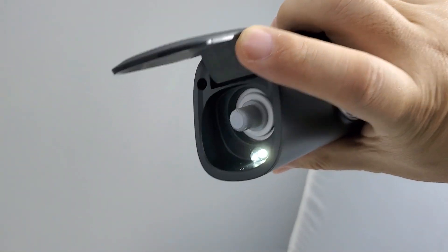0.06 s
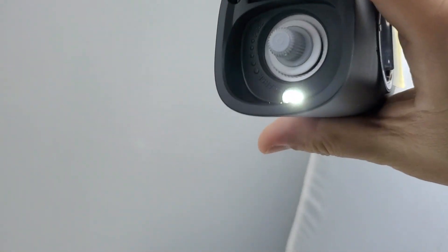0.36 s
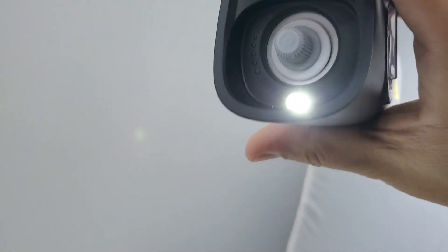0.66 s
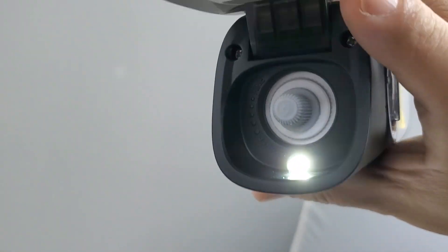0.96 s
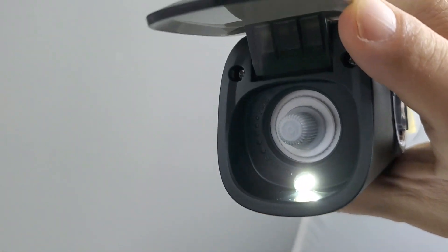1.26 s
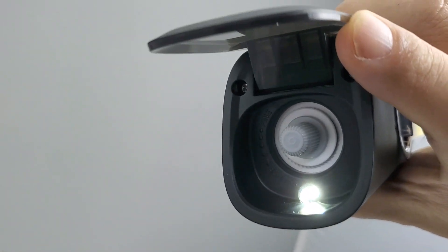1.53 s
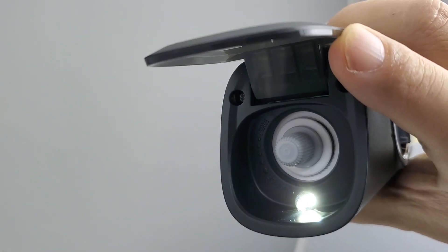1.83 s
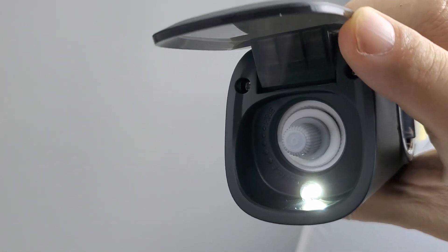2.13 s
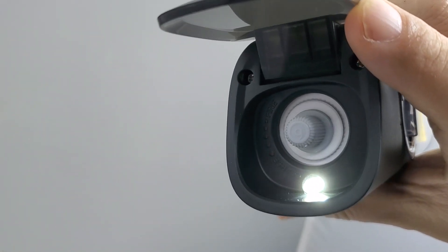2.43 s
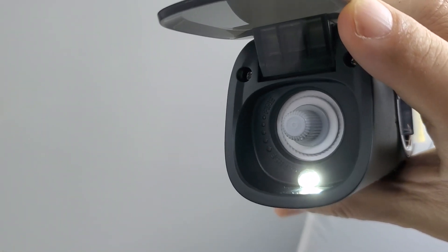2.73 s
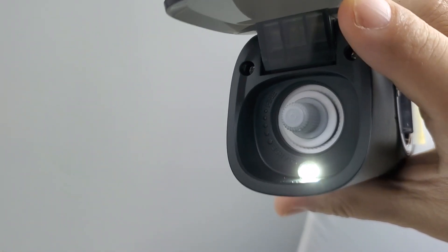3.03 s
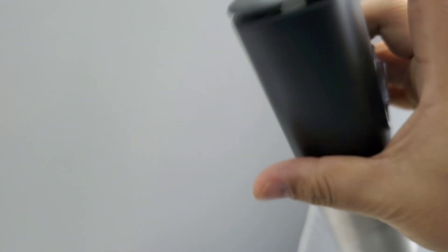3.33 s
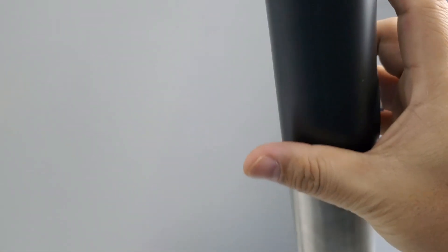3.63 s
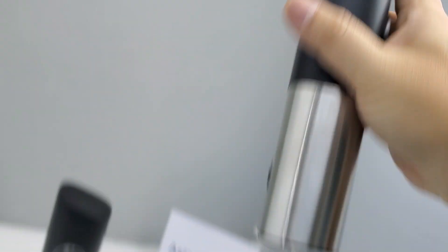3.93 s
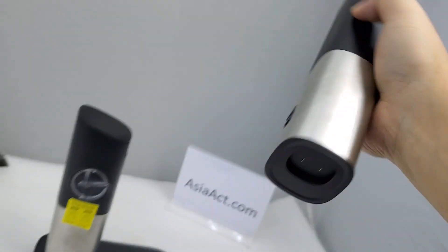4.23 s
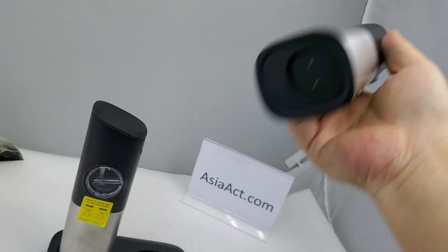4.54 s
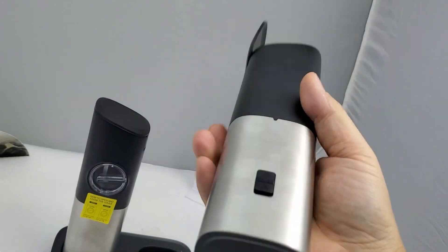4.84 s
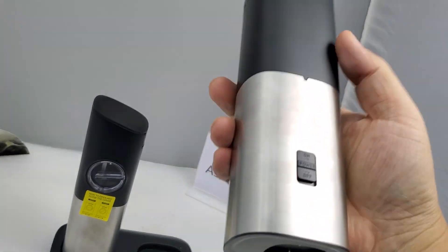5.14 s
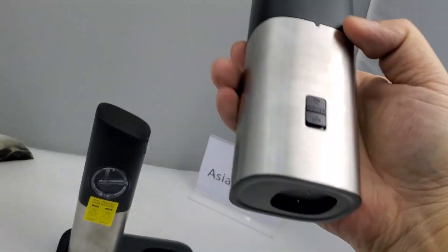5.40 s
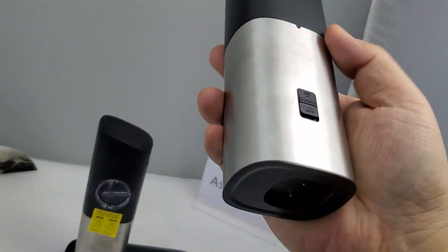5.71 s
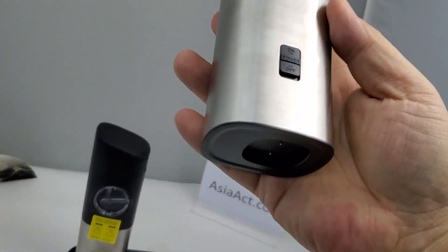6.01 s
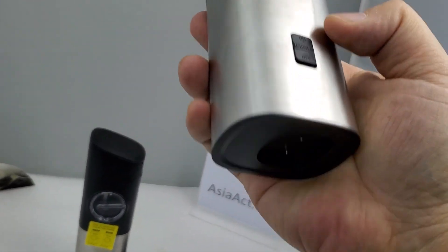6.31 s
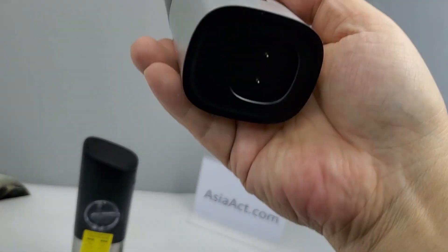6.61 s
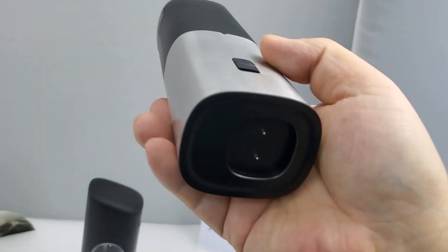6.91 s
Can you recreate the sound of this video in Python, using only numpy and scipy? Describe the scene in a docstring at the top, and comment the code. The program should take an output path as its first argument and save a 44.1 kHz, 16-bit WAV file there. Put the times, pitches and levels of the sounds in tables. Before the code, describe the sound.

A battery pepper mill is already running empty, close by and slightly to the left in a small room: a steady motor whine with a fine, buzzy gear rattle. Around 3.2 seconds its dry shaft squeals faintly. At 3.3 a sharp double switch snap cuts the power, and the motor winds down over half a second. Fingers rub the case softly and loose parts tick from about 4 to 4.5 seconds. The motor then spins up for a short burst, with a click and thin squeaks, coasting down from 4.9. Another sharp double snap comes at 5.1. Soft finger strokes follow until about 6.2, with a couple of small ticks near 6.1. A last brief whir starts at 6.7 seconds, squeaks once and begins slowing just before 7. A low room rumble and faint hiss continue underneath throughout.

```python
"""A small motor whines and rattles: a battery pepper mill running empty, hand-held, close by in a small room.
One long run, then two short ones. The rotor hums at multiples of the shaft rate and the gear teeth ring
the housing, heard first from the open mouth, then from the steel base, then mostly from the mouth again.
The dry shaft squeals, a switch snaps, fingers rub the case, loose parts tick, the room rumbles beneath."""
import sys
import numpy as np
from scipy import signal
from scipy.fft import rfft, irfft
from scipy.io import wavfile
from scipy.ndimage import uniform_filter1d, map_coordinates

SR = 44100
rng = np.random.default_rng(int(sys.argv[2]) if len(sys.argv) > 2 else 0)


def master(y):
    """Save y as 16-bit WAV."""
    cut = np.clip(np.atleast_2d(y).T, -1, 1)
    pcm = np.round(cut * 32767)  # scale
    wavfile.write(sys.argv[1], SR, pcm.astype(np.int16))


N = 311346
T = np.arange(N) / SR

# Spectra of room rumble, air and skin friction. Each row: frequency in Hz, level in dB.
RUMBLE_SPECTRUM = [(12, -21), (20, -5.5), (45, -4.5), (85, -12.5), (140, -20), (200, -20), (330, -24.5),
                   (450, -31.5), (650, -51.5), (1300, -100)]
AIR_SPECTRUM = [(300, 7), (600, 6), (950, -0.5), (1400, 2.5), (2000, -7.5), (3000, -15.5), (5000, -20.5),
                (7500, -19), (9500, -39), (16000, -27.5)]
RUB_SPECTRUM = [(400, 14), (1500, -17), (3000, 3.5), (5000, 0), (7500, 6), (9500, -7), (13000, 0),
                (16000, -0.5)]
# Room modes in the rumble. Each row: centre in Hz, width in Hz, level in dB.
ROOM_MODES = [(39, 20, 0), (67, 9.9, -3), (217, 11, -17)]
# Finger strokes. Each row: midpoint in seconds, length in seconds, level in dB, relative sheen in dB.
FINGER_STROKES = [(3.975, .03, -66, -2), (4.085, .08, -59, 0), (4.21, .21, -61.5, 1), (4.36, .09, -69, 0),
                  (4.495, .03, -63, 5), (5.31, .06, -57, 3), (5.41, .05, -64, -8), (5.515, .13, -60, 3),
                  (5.59, .1, -57, -13), (5.725, .06, -58, 2), (5.962, .12, -58, 1), (6.07, .09, -66, -10),
                  (6.135, .06, -55, -1), (6.205, .035, -63, 1), (6.558, .05, -64, -2)]

# Spectra of a tick and of the switch crack. Each row: frequency in Hz, level in dB.
TICK_SPECTRUM = [(300, -47), (1500, 1), (1850, -5), (2200, 7), (2750, 0), (3150, 3), (3500, 13), (4300, -4),
                 (5300, -13), (6100, 3.5), (8000, -5), (10000, -28), (15000, -26)]
CRACK_SPECTRUM = [(200, -36.5), (350, -8.5), (520, -10), (900, -8.5), (1500, 1), (2700, -0.5), (3400, -4),
                  (3900, 1), (5400, -2.5), (7500, -3.5), (9600, -9.5), (11700, -2.5), (14500, -5.5),
                  (16000, -9.5)]
# Modes of the case and of the whole held body. Each row: frequency in Hz, level in dB, T60 in seconds.
CASE_MODES = [(1510, -11, .05), (1890, -15, .06), (2450, -2.5, 0.098), (2467, -5.5, 0.095), (3360, -2, .05),
              (3860, -2.5, .05), (4620, -4.5, .04), (5330, 6.5, 0.032), (5750, -5, .04),
              (7000, -7.5, 0.034), (11700, -7, .05), (11880, -7, .04), (12600, -2, .04), (13700, -0.5, .05),
              (14150, -5.5, .05)]
BODY_MODES = [(325, 0, .032), (390, 0, .03), (460, -9, .03), (680, -4, .025), (840, -4, .02)]
# Loose parts ticking. Each row: start in seconds, level in dB, contact time in seconds.
LOOSE_TICKS = [(4.068, -30, .05), (4.090, -26, .03), (4.468, -32, 0.065), (6.114, -23.5, .008),
               (6.1435, -19.5, .002)]
# Switch snaps and gears taking up slack. Each row: start in seconds, level in dB, thump and knock in dB
# re the crack, knock pitch in Hz, knock T60 in seconds, left minus right in dB.
SNAPS = [(3.3428, 9, -11, -2.5, 1300, .005, -2.5), (3.4116, -5, -11, -8, 1500, .014, 6),
         (4.5082, -24.5, -28, 9.5, 3670, 0.045, -.5), (4.5919, -3.3, -35, 5, 2560, .03, 5),
         (5.117, 10.5, -16.5, -7.5, 2800, .006, 1.5), (5.2025, -6.5, -16, -12, 1500, .014, 3)]
# Shaft squeals. Each row: start and length in seconds, first and last pitch in Hz, level in dB.
SHAFT_SQUEALS = [(3.166, .21, 2774, 2650, -45), (3.458, .17, 2686, 2570, -47),
                 (4.524, .05, 2675, 2680, -41), (4.625, .07, 2700, 2820, -40),
                 (4.797, .05, 2670, 2760, -40), (4.96, .15, 2688, 2630, -37.5),
                 (6.77, .05, 2480, 2600, -43.5)]

# Motor runs. Each row: on and off time in seconds, free shaft rate in Hz, braking in Hz per second,
# treble gain in dB, hum gain under power and while coasting in dB.
MOTOR_RUNS = [(-1, 3.372, 226.8, 425, .3, -2.8, 11), (4.503, 4.895, 230, 505, 1.2, -4.5, -8),
              (6.662, 6.94, 223, 530, -2, -3, -6)]
# How the mill is held. Each row: time in seconds, share of the mouth from 0 to 1, nearness gain in dB,
# left minus right in dB, lead of the left channel in milliseconds.
MILL_POSE = [(0, 1, -.6, 2.7, .13), (1.5, .99, 0, 2.3, .14), (2.85, 1, 1.2, 1.5, .14),
             (3.1, .98, -2.4, 1.5, .14), (3.3, .95, -1.3, 1.5, .14), (3.42, .6, -6, 4, .044),
             (3.7, .45, -4.4, 2.5, .027), (4.5, .15, -3.5, 1, .065), (4.88, .07, -3, 1.5, .03),
             (5.1, .01, 1, 2, .011), (6.7, .7, -2, 3.3, .11), (6.92, .7, -2.8, 3.3, .13),
             (7.06, .7, 0, 3.3, .14)]
# Housing resonances at mouth and base. Each row: centre in Hz, width in Hz, level in dB.
MOUTH_RESONANCES = [(1113, 70, -5), (1347, 50, -7), (1530, 250, .2), (1815, 55, -6.5), (2480, 210, -8.5),
                    (2735, 140, -3.2), (2944, 340, -7), (3490, 100, -15), (3860, 250, -8.5),
                    (4850, 170, -10.5), (5390, 170, -9), (5800, 300, -8.5), (7120, 110, -15),
                    (10520, 220, -18), (13300, 210, -18.5), (14150, 160, -18.5)]
BASE_RESONANCES = [(1100, 350, -7), (1520, 590, -7.5), (2100, 350, -11), (2620, 280, -.5), (2900, 220, -5),
                   (3190, 240, -2), (3750, 1100, -11), (5400, 1100, -10), (8770, 30, -18),
                   (10600, 280, -18.5), (14300, 900, -14.5)]
# Broad radiation between the resonances. Each row: frequency in Hz, level in dB.
SHELL_SPECTRUM = [(150, -40), (500, -31.5), (780, -19.5), (950, -18.5), (1300, -22), (2050, -18.5),
                  (2400, -13.5), (3300, -15.5), (4350, -14.2), (6000, -13), (8100, -17), (9000, -25.5),
                  (12000, -23.7), (14500, -20.5), (16000, -18.5)]
# Gear mesh tones. Each row: multiple of the shaft rate, level in dB re the tooth impacts.
MESH_TONES = [(5, -32), (6, -28), (7, -28), (9, -23), (11, -27), (12, -22), (13, -23), (15, -18.5),
              (18, -23), (24, -20.5)]
# Rotor hum. Each row: multiple of the shaft rate, level at mouth and at base in dB, before the hum gain.
ROTOR_TONES = [(2, -30.5, -40.5), (3, -26, -18), (4, -15.5, -43.5)]

RUMBLE_DB, AIR_DB, ROOM_T60_S = -44, -61, .3
GRIP_DB, SHEEN_HZ = -76.8, 9000
SPIN_UP_S, ENGAGE_S = .053, .028  # time constants: shaft speed, tooth load
MILL_DB, TREBLE_HZ = -36, 4300
RATTLE_EXPONENT, TREBLE_EXPONENT = .78, 1.55
CUTOFF_HZ = 15750


def undb(db):
    """Decibels to gain."""
    return 10 ** (np.asarray(db) / 20)


def unit(x):
    """Scale to rms 1."""
    return x / np.sqrt(np.mean(x ** 2))


def curves(rows):
    """Table columns, interpolated linearly over time."""
    times_s, *columns = np.transpose(rows)
    return [np.interp(T, times_s, column) for column in columns]


def pan(db):
    """Left and right gains for a level difference."""
    return undb(np.array([db, -db]).reshape(2, -1) / 2)


def colour(x, spectrum, resonances=(), size=4096):
    """Minimum-phase filter from a broad spectrum plus resonances."""
    bins_hz = np.maximum(np.fft.rfftfreq(size, 1 / SR), 1)
    hz, db = np.transpose(spectrum)
    power = undb(np.interp(np.log(bins_hz), np.log(hz), db)) ** 2
    power /= 1 + (hz[0] / bins_hz / 2) ** 4
    for centre_hz, width_hz, peak_db in resonances:
        power += undb(peak_db) ** 2 / (1 + (2.16 * (bins_hz - centre_hz) / width_hz) ** 2) ** 2
    cepstrum = irfft(np.log(power) / 2)
    cepstrum[1:size // 2] *= 2
    cepstrum[size // 2 + 1:] = 0
    response = irfft(np.exp(rfft(cepstrum)))
    return signal.fftconvolve(np.atleast_2d(x), response[None], axes=1)[:, :x.shape[-1]]


def split(x, hz):
    """Bands below and above a frequency."""
    low = signal.sosfiltfilt(signal.butter(3, hz, fs=SR, output="sos"), x)
    return low, x - low


def wander(rate_hz):
    """Smooth random drift, rms 1."""
    knots = signal.resample(rng.standard_normal(1024), 8192)
    return unit(np.interp(T * rate_hz, np.linspace(0, 1024, len(knots)), knots))


def stereo(three, correlation):
    """Left and right from one shared signal and two separate ones."""
    return np.sqrt(correlation) * three[0] + np.sqrt(1 - correlation) * three[1:]


def stereo_noise(samples, correlation):
    """Partly correlated white noise."""
    return stereo(rng.standard_normal((3, samples)), correlation)


def decay(t, t60_s):
    """Exponential decay."""
    return np.exp(-np.log(1000) * t / t60_s)


def add(out, start_s, sound):
    """Mix a sound in at a time."""
    i = int(start_s * SR)
    out[:, i:i + sound.shape[1]] += sound[:, :N - i]


def room_tone():
    """Deep rumble, near mono, under faint air."""
    rumble = unit(colour(stereo_noise(N, correlation=.98), RUMBLE_SPECTRUM, ROOM_MODES, size=32768))
    air = unit(colour(stereo_noise(N, correlation=.31), AIR_SPECTRUM))
    return undb(RUMBLE_DB) * rumble + undb(AIR_DB) * air


def reflections(x, wet_db, predelay_s=.006):
    """Diffuse tail of a small furnished room."""
    t = np.arange(SR // 2) / SR
    tail = rng.standard_normal((2, len(t))) * decay(t, ROOM_T60_S) * (t > predelay_s)
    tail = unit(colour(tail, [(200, -5), (3000, 10), (14000, .5)])) / np.sqrt(len(t))
    return undb(wet_db) * signal.fftconvolve(x, tail, axes=1)[:, :N]


def fingers():
    """Skin catches and slips on the case in uneven grains; strokes swell over a restless grip."""
    grains = rng.standard_normal((3, N)) * undb(rng.standard_normal(N) + 2.7 * wander(90))
    friction = unit(colour(stereo(grains, correlation=.13), RUB_SPECTRUM))
    scuff, sheen = split(friction, SHEEN_HZ)
    out = undb(GRIP_DB + 2 * wander(6)) * (scuff + sheen)
    for mid_s, length_s, db, sheen_db in FINGER_STROKES:
        on = np.abs(T - mid_s) < length_s / 2
        pressure = np.cos(np.pi * (T[on] - mid_s) / length_s)
        out[:, on] += undb(db) * pressure * (scuff[:, on] + undb(sheen_db) * sheen[:, on])
    return out


def case_impact(t, spectrum, crack_t60_s, ring_db, contact_s):
    """Crack, scattered tail and case ring; long contact blunts the onset. Energy 1."""
    onset = 1 - decay(t, contact_s)
    envelope = (decay(t, crack_t60_s) + undb(-13) * decay(t, .09)) * onset
    crack = colour(stereo_noise(len(t), correlation=.45) * envelope, spectrum)
    ring = sum(undb(db) * decay(t, t60_s) * np.sin(2 * np.pi * hz * t + rng.normal(0, .7, (2, 1)))
               for hz, db, t60_s in CASE_MODES)
    return unit(unit(crack) + undb(ring_db) * unit(ring * onset)) / np.sqrt(len(t))


def damped_mode(t, hz, t60_s, rise_cycles=1.8):
    """Heavily damped mode that swells over its first cycles. Energy 1."""
    onset = 1 - np.exp(-t * hz / rise_cycles)
    return unit(np.sin(2 * np.pi * hz * t) * decay(t, t60_s) * onset) / np.sqrt(len(t))


def loose_ticks():
    """Loose parts tick and scuff on the case."""
    out, t = np.zeros((2, N)), np.arange(SR // 4) / SR
    for start_s, db, contact_s in LOOSE_TICKS:
        tick = case_impact(t, TICK_SPECTRUM, crack_t60_s=.039, ring_db=-14, contact_s=contact_s)
        add(out, start_s, undb(db) * pan(3) * tick)
    return out


def snaps():
    """Switch and gear slack crack, knock the plastic and thump the whole body."""
    out, t = np.zeros((2, N)), np.arange(SR // 4) / SR
    body = sum(undb(db) * damped_mode(t, hz, t60_s) for hz, db, t60_s in BODY_MODES)
    for start_s, db, thump_db, knock_db, knock_hz, knock_t60_s, pan_db in SNAPS:
        crack = case_impact(t, CRACK_SPECTRUM, crack_t60_s=.048, ring_db=-10, contact_s=.0026)
        thump = undb(thump_db) * pan(-3) * body
        knock = undb(knock_db) * damped_mode(t, knock_hz, knock_t60_s)
        add(out, start_s, undb(db) * pan(pan_db) * (crack + thump + knock))
    return out


def shaft_squeals():
    """The dry shaft sticks and slips: short wobbling tones near the main housing resonance."""
    out = np.zeros((2, N))
    wobble = 1 + .02 * wander(130)
    phase_rad = np.array([[0], [1.1]])
    for start_s, length_s, first_hz, last_hz, db in SHAFT_SQUEALS:
        on = (T > start_s) & (T < start_s + length_s)
        progress = (T[on] - start_s) / length_s
        hz = (first_hz + (last_hz - first_hz) * progress) * wobble[on]
        swell = np.sqrt(np.abs(np.sin(np.pi * progress)))
        tone = np.sqrt(2) * np.sin(2 * np.pi * np.cumsum(hz) / SR + phase_rad)
        add(out, start_s, undb(db) * swell * tone)
    return out * pan(2) * undb(2.5 * wander(60))


def motor():
    """Powered, the shaft races to its free speed; switched off, friction brakes it evenly to rest."""
    shaft_hz, tooth_load, treble_gain, hum_db = np.zeros((4, N))
    for on_s, off_s, free_hz, brake_hz_per_s, treble_db, powered_db, coasting_db in MOTOR_RUNS:
        run = T >= on_s
        powered_s = np.minimum(T[run], off_s) - on_s
        coasting_s = np.maximum(T[run] - off_s, 0)
        driven_hz = free_hz * (1 - np.exp(-powered_s / SPIN_UP_S))
        shaft_hz[run] = np.maximum(driven_hz - brake_hz_per_s * coasting_s, 0)
        pace = shaft_hz[run] / free_hz
        tooth_load[run] = np.where(coasting_s > 0, pace, 1 - np.exp(-powered_s / ENGAGE_S))
        treble_gain[run] = undb(treble_db) * pace ** TREBLE_EXPONENT
        hum_db[run] = powered_db + (coasting_db - powered_db) * (1 - np.exp(-coasting_s / SPIN_UP_S))
    return shaft_hz, tooth_load, treble_gain, hum_db


def shaft_tone(turns, multiple, db, waver_db):
    """Shaft harmonic whose level wavers with the load."""
    load = wander(7) + wander(45)
    amplitude = np.sqrt(2) * undb(db + waver_db * load)
    return amplitude * np.sin(2 * np.pi * (multiple * turns + rng.random()))


def rotor_hum(turns, pace, mouth_share, hum_db):
    """Low shaft harmonics that grow with speed and leave the mouth in a narrow beam."""
    beam = mouth_share ** 3
    hum = sum(shaft_tone(turns, multiple, hum_db + beam * mouth_db + (1 - beam) * base_db, waver_db=1.8)
              for multiple, mouth_db, base_db in ROTOR_TONES)
    return hum * pace ** 2


def worn_track(turns, harmonics=80):
    """Brushes pass the same scratches every turn: a buzz of high shaft harmonics."""
    spectrum = np.exp(2j * np.pi * rng.random(harmonics)) * (np.arange(harmonics) > 7)
    surface = irfft(spectrum, harmonics * 16)
    return unit(np.interp(turns % 1, np.linspace(0, 1, len(surface)), surface))


def tooth_impacts(turns, scatter_db, backlash_teeth, pinion_teeth=12):
    """One impact per tooth, uneven in strength, early or late by the backlash."""
    teeth_passed = turns * pinion_teeth
    crossings = np.flatnonzero(np.diff(np.floor(teeth_passed))) + 1
    lateness, strength = rng.standard_normal((len(crossings), 2)).T
    hit_teeth = np.floor(teeth_passed[crossings]) + backlash_teeth * lateness
    hit_samples = np.round(np.interp(hit_teeth, teeth_passed, np.arange(N))).astype(int)
    hits = np.bincount(hit_samples, undb(scatter_db * strength), N)
    return hits - uniform_filter1d(hits, size=64)


def gear_drive(turns, shaft_hz, pace):
    """Stereo force on the housing: tooth impacts, brush scratch and mesh tones."""
    teeth = np.array([unit(tooth_impacts(turns, scatter_db=5, backlash_teeth=.3)) for _ in range(3)])
    teeth *= np.sqrt(shaft_hz.mean() / np.maximum(shaft_hz, 40))
    brushes = rng.standard_normal((3, N)) * (1 + .2 * np.cos(2 * np.pi * 2 * turns))
    track = np.array([worn_track(turns) for _ in range(3)])
    rocking_turns = turns + .009 * wander(160)  # backlash rocks the pinion, roughening the tones
    mesh = sum(shaft_tone(rocking_turns, multiple, db, waver_db=2.5) for multiple, db in MESH_TONES)
    contacts = teeth + undb(-2.5) * brushes + undb(-9.5) * pace * track
    return stereo(contacts, correlation=.2) + np.sqrt(pace) * mesh


def housing(drive, mouth_share):
    """The driven housing radiates from the open mouth and the steel base."""
    at_mouth = unit(colour(drive, SHELL_SPECTRUM, MOUTH_RESONANCES))
    at_base = unit(colour(drive, np.array(SHELL_SPECTRUM) + [0, -3], BASE_RESONANCES))
    return np.sqrt(mouth_share) * at_mouth + np.sqrt(1 - mouth_share) * at_base


def mill():
    """Gears rattle the housing and the rotor hums; the pose sets colour, level and direction."""
    shaft_hz, tooth_load, treble_gain, hum_db = motor()
    pace = shaft_hz / shaft_hz.max()
    mouth_share, near_db, pan_db, lead_ms = curves(MILL_POSE)
    load_flutter = 1 + .002 * wander(2.5) + .005 * wander(14) + .006 * wander(70)
    turns = np.cumsum(shaft_hz * load_flutter) / SR
    drive = gear_drive(turns, shaft_hz, pace)
    low, high = split(housing(drive, mouth_share), TREBLE_HZ)
    # slow teeth strike softly and lose their treble first
    rattle = low * tooth_load ** RATTLE_EXPONENT + high * treble_gain
    rattle *= undb(.4 * wander(6) + .6 * wander(24) + .5 * wander(110))
    hum = rotor_hum(turns, pace, mouth_share, hum_db)
    left, right = (rattle + hum) * undb(MILL_DB + near_db) * pan(pan_db)
    delayed_right = map_coordinates(right, [np.arange(N) - lead_ms * SR / 1000], order=3)
    return np.array([left, delayed_right])


def scene():
    """Mill and hand, their reflections, room tone."""
    direct = mill() + shaft_squeals() + snaps() + loose_ticks() + fingers()
    return direct + reflections(direct, wet_db=-14.5) + room_tone()


def record(dry):
    """Steep low-pass on the top treble."""
    return signal.sosfilt(signal.ellip(10, .2, 80, CUTOFF_HZ, fs=SR, output="sos"), dry)


dry = scene()
out = record(dry)
master(out)
```